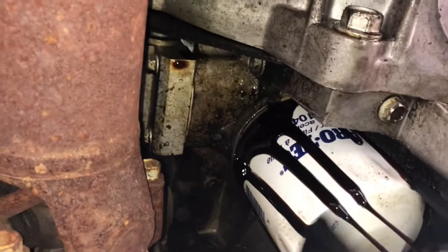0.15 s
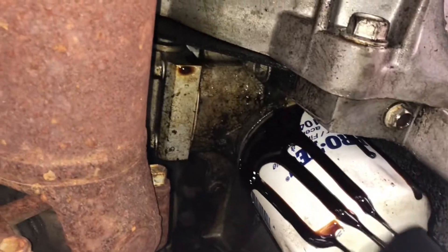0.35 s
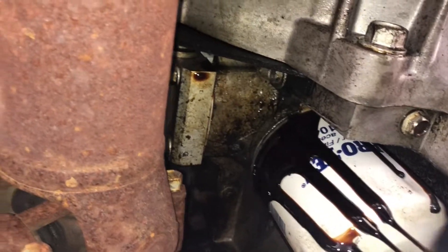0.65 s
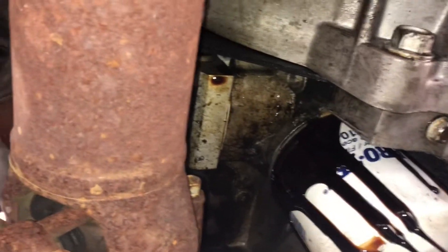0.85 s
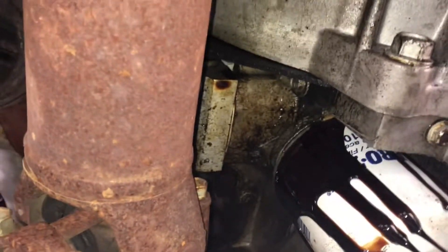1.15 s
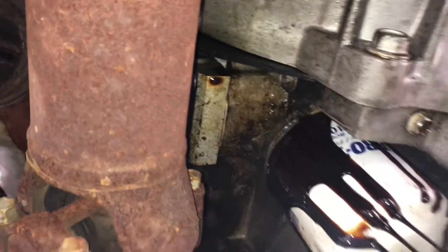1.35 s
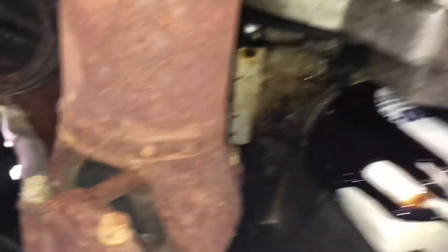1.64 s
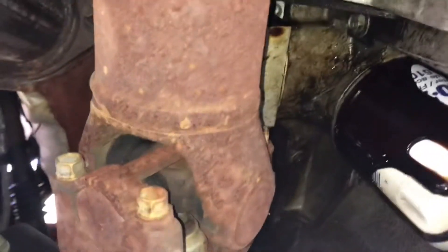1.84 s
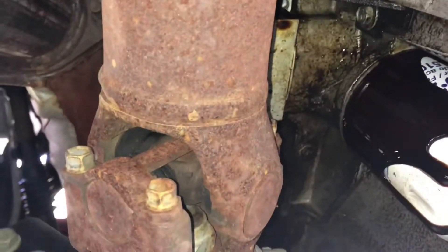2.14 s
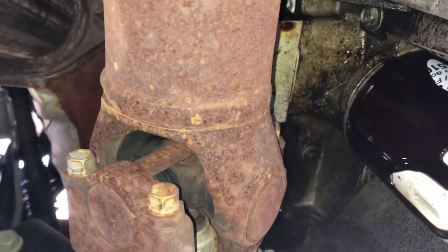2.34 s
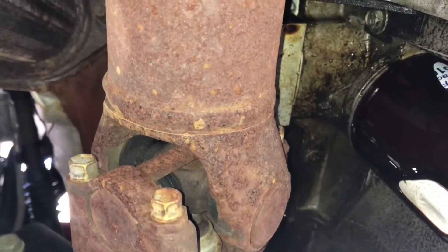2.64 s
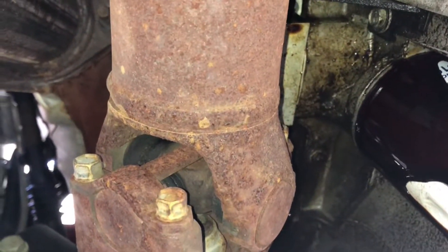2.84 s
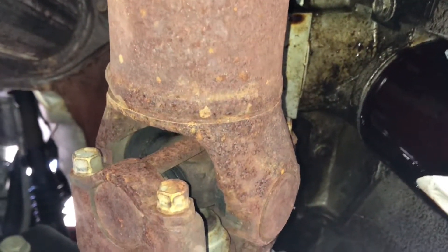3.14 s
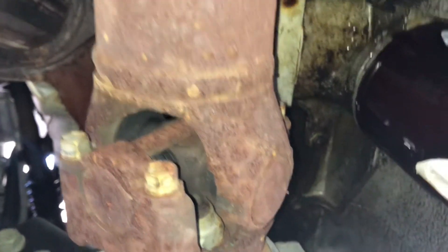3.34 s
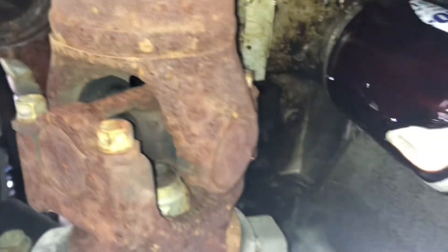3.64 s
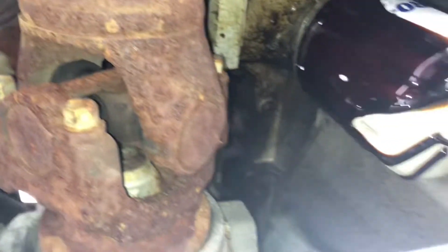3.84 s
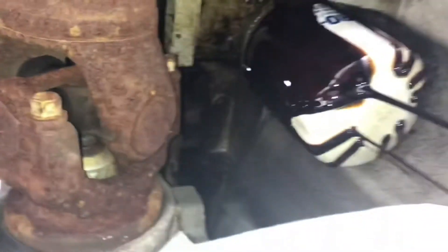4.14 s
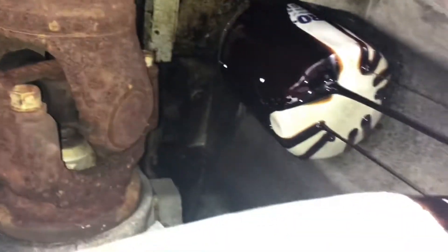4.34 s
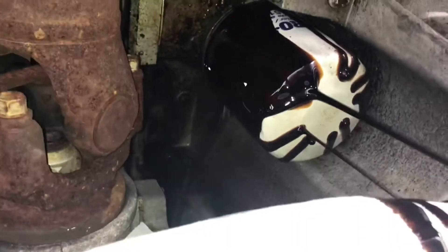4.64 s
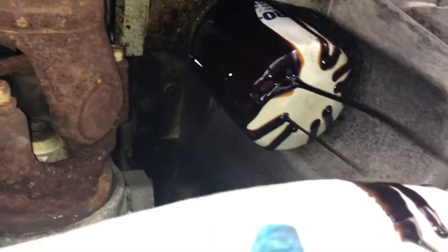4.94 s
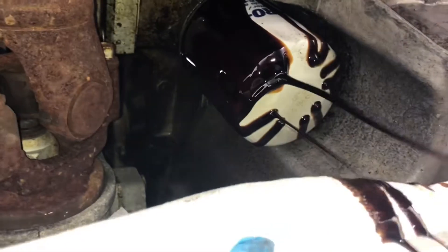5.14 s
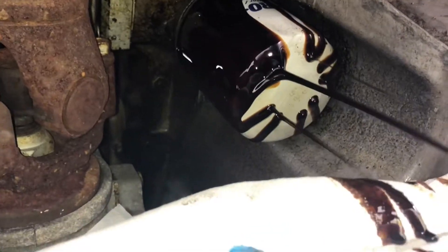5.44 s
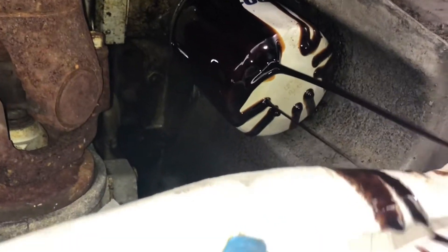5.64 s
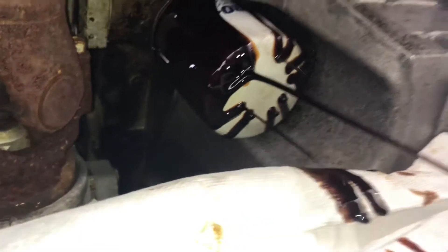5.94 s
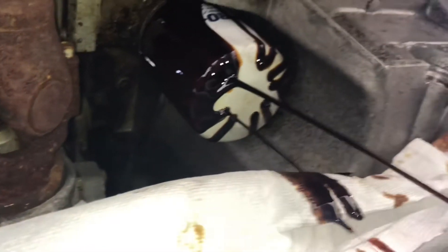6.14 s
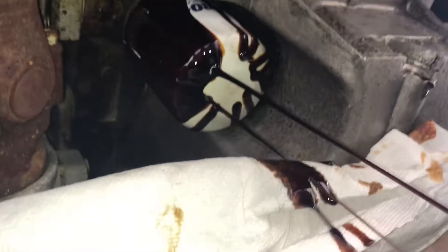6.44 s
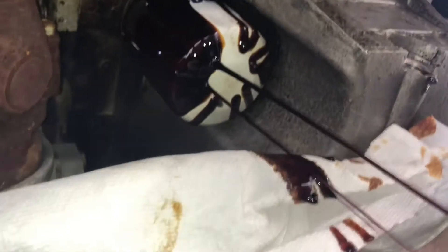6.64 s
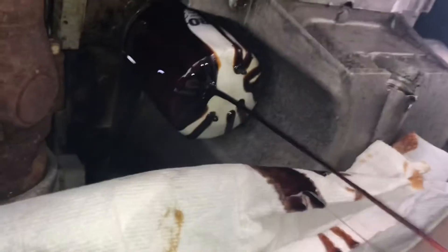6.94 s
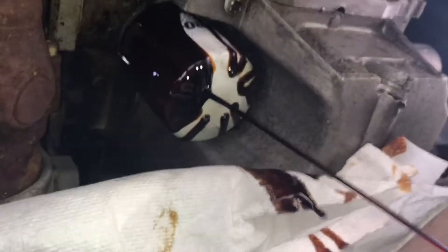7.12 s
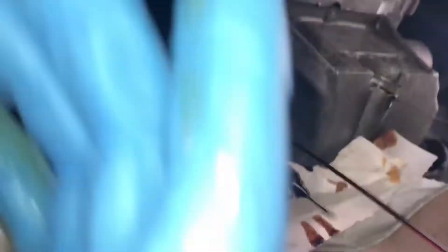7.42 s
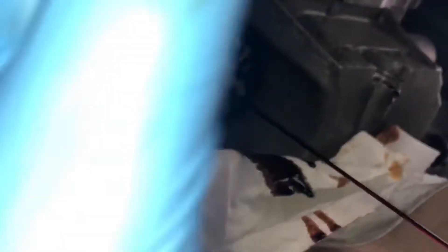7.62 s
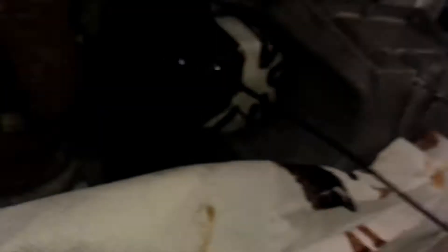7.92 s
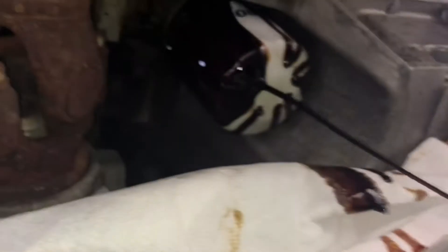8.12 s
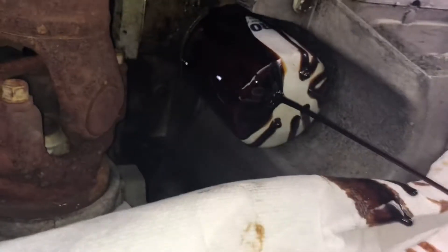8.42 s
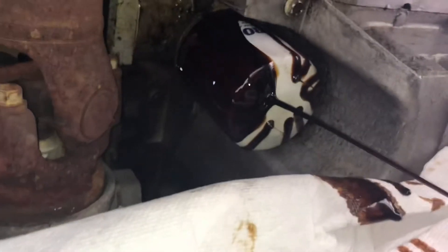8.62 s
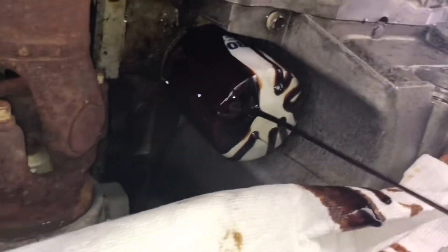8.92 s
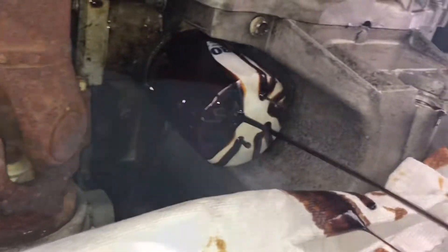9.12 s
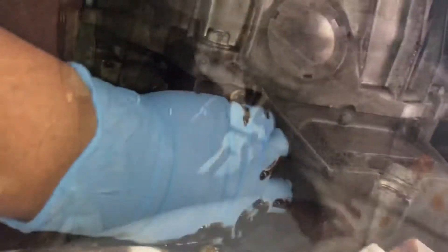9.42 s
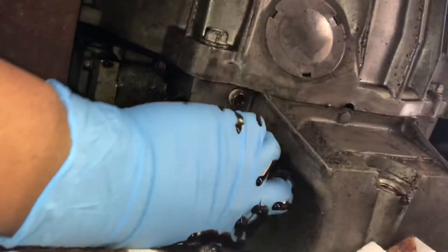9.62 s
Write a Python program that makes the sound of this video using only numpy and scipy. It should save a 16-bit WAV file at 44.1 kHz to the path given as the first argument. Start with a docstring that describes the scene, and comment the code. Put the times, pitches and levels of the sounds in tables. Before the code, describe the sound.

Under a vehicle in a garage, close microphone. A few small sharp wrench clicks and cloth rustle, then the wrench drops and clatters in a plastic drain pan for about a second. Oil gushes out, splatting and drumming on the pan, then trickling, plopping and spitting into its own puddle. A six-cylinder engine hums steadily some way off.

```python
"""Garage, under a vehicle: a cap wrench clicks off a loosened oil filter, drops and clatters into the drain pan.
Contacts are cracks plus ringing modes. Oil patters on the bare pan, then trickles, plops and spits into its
own puddle: bubble grains, single bubbles and noise bursts. One flow sets trickle, spray and small-drop rate.
Glove and paper towel rustle as swelling noise; a like hiss swells at the end.
A six-cylinder engine idles some way off: a sum of orders."""
import sys
import numpy as np
from scipy import signal
from scipy.fft import rfft, irfft, next_fast_len
from scipy.io import wavfile
from scipy.ndimage import uniform_filter1d, map_coordinates

SR = 44100
rng = np.random.default_rng(int(sys.argv[2]) if len(sys.argv) > 2 else 0)


def store_wav(level_fs):
    """Save 16-bit WAV to argv[1]."""
    pcm = np.round(np.clip(np.atleast_2d(level_fs), -1, 1) * 32767)
    wavfile.write(sys.argv[1], SR, pcm.T.astype(np.int16))


N = 430857
TIME = np.arange(N) / SR
AGE = np.arange(SR // 3) / SR  # time axis of one event


def amp(db):
    """Decibels to gain."""
    return 10 ** (np.asarray(db) / 20)


def unit(x):
    """Scale to rms 1."""
    return x / np.sqrt(np.mean(x ** 2) + 1e-20)


def along(points, hz):
    """Interpolate (f/Hz, value) points on a log axis."""
    f, v = np.transpose(points)
    return np.interp(np.log(hz + 1), np.log(f + 1), v)


def gains(rows):
    """One gain curve per dB column, -120 dB outside the rows."""
    s, *columns = np.transpose(rows)
    return [amp(np.interp(TIME, s, column, left=-120, right=-120)) for column in columns]


def filtered(x, response):
    """Multiply the spectrum of x by a response of frequency."""
    size = next_fast_len(len(x) + 8192)
    spectrum = rfft(x, size) * response(np.fft.rfftfreq(size, 1 / SR))
    return irfft(spectrum, size)[:len(x)]


def noise(spectrum, size=N):
    """Coloured noise of rms 1."""
    white = rng.standard_normal(size)
    return unit(filtered(white, lambda hz: amp(along(spectrum, hz))))


def wobble(rate_hz):
    """Smooth random curve, rate_hz knots a second."""
    knots = rng.standard_normal(int(N * rate_hz / SR) + 4)
    return map_coordinates(knots, [TIME * rate_hz])


def fade(t, t60_s):
    """Exponential decay, 60 dB in t60_s."""
    return 1000 ** (-t / np.maximum(t60_s, 1e-4))


def swells(rows):
    """Gain of (t/s, level/dB, rise/s, fall/s) swells; rise and fall each span 20 dB."""
    gain = 0
    for s, db, rise_s, fall_s in rows:
        gain = gain + amp(db - 20 * np.maximum((s - TIME) / rise_s, (TIME - s) / fall_s))
    return gain


def add(track, s, sound):
    """Mix a sound in at s seconds."""
    part = track[max(round(s * SR), 0):][:len(sound)]
    part += sound[:len(part)]


def bubble(t, hz, cycles, rise):
    """Damped sine whose pitch climbs as the bubble nears the surface."""
    life_s = cycles / hz
    climb = t + rise * (t - life_s / 2 * (1 - np.exp(-2 * t / life_s)))
    return np.sin(2 * np.pi * hz * climb) * fade(t, life_s) * (1 - np.exp(-2 * hz * t))


def grains(count, hz, spread, cycles, rise, size_db):
    """Shower of tiny bubbles of random time, pitch and size, levelled to rms 1 over half seconds."""
    when, pitch, size = rng.random((count, 3)).T
    scatter = np.log(pitch / (1 - pitch)) / 2
    pitch_hz = np.clip(hz * np.exp(spread * scatter), 300, 14000)
    t = AGE[:SR // 50]
    strength = amp(-size_db * np.log(np.maximum(size, .02)))
    waves = strength[:, None] * bubble(t, pitch_hz[:, None], cycles, rise)
    where = (when * N).astype(int)[:, None] + np.arange(len(t))
    shower = np.bincount(where.ravel(), waves.ravel(), N)[:N]
    return shower / np.sqrt(np.abs(uniform_filter1d(shower ** 2, SR // 2)) + 1e-9)


# decay of the echo off floor and underbody: f/Hz, t60/s
ECHO_DECAY = [(150, 0.2), (1200, 0.11), (5000, 0.052), (15000, 0.08)]


def echoed(x, wet_db):
    """Floor and underbody answer with a short dense tail, a new one for each third of a second."""
    out = x.copy()
    block = SR // 3
    for start in range(0, N, block):
        hz, t, z = signal.stft(rng.standard_normal(block), SR, nperseg=128)
        decay = fade(t, along(ECHO_DECAY, hz)[:, None])
        tail = signal.istft(z * decay, SR, nperseg=128)[1]
        tail = tail / np.linalg.norm(tail)
        add(out, start / SR + .002, amp(wet_db) * signal.fftconvolve(x[start:start + block], tail))
    return out


# engine orders: multiple of the four-stroke cycle rate, level/dB rms
ENGINE_ORDERS = [(6, -68.5), (10, -62.5), (12, -41.5), (13, -67.5), (14, -48), (15, -51.5), (16, -54.5),
                 (17, -48.5), (18, -46.5), (19, -72), (20, -53.5), (21, -46), (22, -72), (23, -46.5),
                 (24, -63), (25, -49), (26, -52.5), (27, -75.5), (30, -68.5), (33, -68), (34, -63),
                 (38, -57.5), (44, -60.5)]
# gain of engine and garage noise: t/s, level/dB
IDLE_GAIN = [(0, 1), (4.7, 0), (9.05, 0), (9.35, -3.5), (9.6, 0), (9.77, -0.5)]
# garage noise spectrum: f/Hz, level/dB per Hz
GARAGE_SPECTRUM = [(25, -25.5), (40, -5), (62, 1.5), (88, -1), (125, 2.5), (172, -2), (205, 0.5),
                   (330, -12), (520, -17.5), (1000, -22), (2000, -27), (4200, -32), (8000, -43),
                   (16000, -75)]
CYCLE_HZ, HEAVY_FIRING_S = 6.668, .104


def engine():
    """Six firings a cycle make the hum; one heavier firing gives the lope, smeared by the walls."""
    hum = np.zeros(N)
    for multiple, db in ENGINE_ORDERS:
        order = round(multiple)
        smear = rng.normal(0, 0.95) * (order % 6 > 0)  # firing orders stay in phase
        phase = 2 * np.pi * order * CYCLE_HZ * (TIME - HEAVY_FIRING_S) + smear
        hum += amp(db + 0.84 * wobble(3)) * np.sqrt(2) * np.cos(phase)
    # a wavering drone beats with the hum
    drone = amp(-46.5 + 2.2 * wobble(5.7)) * np.sin(2 * np.pi * 85.0 * TIME + 0.83 * wobble(2.008))
    return gains(IDLE_GAIN)[0] * (hum + drone + amp(-42.5) * noise(GARAGE_SPECTRUM))


# glove, sleeve and towel sliding; the last row is a hiss that swells at the end:
# t/s of the maximum, level/dB, rise/s, fall/s
RUSTLE_SWELLS = [(.29, -47, 0.068, 0.25), (.55, -45, 0.24, .15), (1.43, -47.5, 0.21, 1.3),
                 (2.85, -58.5, .5, 2.8), (5.28, -46, .3, 0.1), (5.65, -50, 0.18, 0.16),
                 (8.2, -44.5, 0.096, 0.079), (9.77, -48.5, 0.36, .2)]
# cloth noise spectrum: f/Hz, level/dB per Hz
CLOTH_SPECTRUM = [(200, -17.5), (700, 4.5), (1400, 13.5), (2000, 7.5), (3000, 7), (6000, 5), (12000, 0.5),
                  (16000, -9.5)]
HOLD_DB = -67.5  # the hand never lies quite still


def rustle():
    """Soft noise that swells with each stroke and once more at the end, fluttering a little."""
    flutter = amp(1.3 * wobble(40))
    return np.hypot(swells(RUSTLE_SWELLS), amp(HOLD_DB)) * flutter * noise(CLOTH_SPECTRUM)


# strength of the thread of oil, relative: t/s, level/dB
OIL_FLOW = [(2.149, -57), (2.55, -61), (2.701, -51), (3.75, -52.5), (4.25, -54), (4.7, -55.5), (5.2, -48),
            (5.55, -57.5), (6.0, -59), (6.45, -59), (6.8, -49.5), (7.12, -50), (7.22, -59.5), (8.1, -75),
            (8.3, -53.5), (8.5, -63), (9.05, -60), (9.35, -62.5)]
# gushes that drum on the pan and ebb: t/s of the maximum, relative level/dB, rise/s, ebb/s
OIL_GUSHES = [(2.72, -35, 0.29, 1.4), (3.24, -62, 0.13, 0.15), (3.83, -44, .04, 0.067),
              (8.135, -38, 0.01, 0.38)]
# the thread folds and stirs a run of bubbles into the puddle: t/s, length/s, level/dB, f/Hz
GURGLE_RUNS = [(3.411, 0.077, -40, 1180), (3.648, 0.15, -41, 1166), (3.959, 0.042, -39.5, 1413),
               (4.085, 0.063, -41, 2230), (4.402, 0.037, -43, 860), (5.17, 0.034, -61, 1260),
               (5.901, 0.017, -38, 816), (6.107, 0.042, -36, 1125), (6.471, 0.035, -35, 1180),
               (6.75, 0.085, -37.5, 1400), (6.843, 0.072, -39, 1270), (6.96, 0.13, -37.5, 1202),
               (8.126, 0.071, -38, 1184), (8.679, 0.032, -37, 1395), (8.776, .06, -44.5, 1150),
               (8.899, 0.17, -41.5, 1034)]
SPRAY_DB, SPRAY_SAG_DB_PER_S = -3, 0.5  # re flow; the deepening puddle softens it
GURGLE_EDGE_S, FROTH_DB = 0.013, -18  # finer bubbles froth around each run; level re run


def stream():
    """The thread of oil drums on the pan, stirs small bubbles in the puddle and throws a fine spray."""
    trickle, = gains(OIL_FLOW)
    spray = trickle * amp(SPRAY_DB - SPRAY_SAG_DB_PER_S * (TIME - OIL_FLOW[0][0]))
    froth = 0
    for s, length_s, db, _ in GURGLE_RUNS:
        inside_s = np.minimum(TIME - s, s + length_s - TIME)
        froth = froth + amp(db + FROTH_DB) * np.clip(inside_s / GURGLE_EDGE_S + .5, 0, 1)
    # bubbles need a puddle; on bare plastic the oil only patters
    depth = np.interp(TIME, [3.2, 3.45], [.15, .96])
    drumming = swells(OIL_GUSHES) * grains(count=3000, hz=612, spread=0.23, cycles=3.8, rise=0.028, size_db=4.5)
    patter = grains(count=9000, hz=1700, spread=0.36, cycles=5.1, rise=0.025, size_db=1.0)
    gurgle = grains(count=1700, hz=1200, spread=.15, cycles=30, rise=.15, size_db=2.6)
    beads = grains(count=2000, hz=2350, spread=.33, cycles=36, rise=.3, size_db=3.4)
    bubbling = amp(-8.0) * gurgle + amp(-6.0) * beads
    puddle = trickle * (depth * bubbling + (1 - depth) * patter) + froth * beads
    fizz = spray * grains(count=4500, hz=6730, spread=0.5, cycles=26, rise=.2, size_db=3.0)
    spurts = unit(amp(2.1 * wobble(45)))  # the thread breaks into clumps
    oil = amp(-10.5) * drumming + amp(-2.0) * puddle + amp(-2.5) * fizz
    return echoed(spurts * oil, wet_db=-4.0)


DROP_RATE_POWER = .65  # power of the flow that sets the drop rate


def small_drops(count, db, scatter_db, hz, spread):
    """Rows (t/s, level/dB, f/Hz) of drops at uneven intervals, more often as the flow grows."""
    fallen = np.cumsum(gains(OIL_FLOW)[0] ** DROP_RATE_POWER)
    share = (np.arange(count) + rng.random(count)) / count
    s = np.interp(share, fallen / fallen[-1], TIME)
    size, pitch = np.clip(rng.standard_normal((count, 2)), -2, 2).T
    return list(zip(s, db + scatter_db * size, hz * np.exp(spread * pitch)))


GURGLE_GAP_S, GURGLE_SCATTER_DB, GURGLE_DETUNE = 0.022, 1.5, 0.036  # bubble to bubble; detune in log pitch


def gurgle_bubbles():
    """Rows (t/s, level/dB, f/Hz) of the like-sized bubbles in each run."""
    rows = []
    for s, length_s, db, hz in GURGLE_RUNS:
        late, size, pitch = np.clip(rng.standard_normal((12, 3)), -2, 2).T
        after_s = GURGLE_GAP_S * np.abs(np.arange(len(late)) + .2 * late)
        levels_db = db + GURGLE_SCATTER_DB * size
        run = np.column_stack([s + after_s, levels_db, hz * np.exp(GURGLE_DETUNE * pitch)])
        rows += list(run[after_s < length_s])
    return rows


# big drops that trap a bubble: t/s, level/dB, nominal f/Hz
BIG_PLOPS = [(3.285, -29, 3040), (3.639, -31, 1296), (3.956, -34.5, 1014), (4.141, -32, 3560),
             (4.381, -25.5, 3200), (4.461, -35, 1940), (4.463, -35.5, 955), (4.653, -35, 4630),
             (4.908, -34, 3900), (5.063, -32, 2970), (5.17, -30, 1244), (5.413, -36, 2140),
             (5.435, -36, 2100), (5.463, -35, 3030), (5.788, -32.5, 1800), (5.818, -29.5, 2850),
             (5.908, -31.5, 3200), (6.11, -29, 1920), (6.468, -33, 1540), (6.561, -35.5, 1812),
             (7.008, -33.5, 1148), (7.125, -21.5, 2370), (7.484, -36.5, 1850), (7.71, -34.5, 3520),
             (7.845, -31.5, 2360), (8.033, -32.5, 3910), (8.12, -27, 852), (8.123, -40, 1850),
             (8.462, -34, 1946), (8.611, -32.5, 1070), (8.66, -31, 1770), (9.048, -31.5, 2137),
             (9.121, -35.5, 2990), (9.133, -33.5, 980), (9.2, -38.5, 1340)]
# sharp spits of oil: t/s, relative level/dB, f/Hz
OIL_SPITS = [(2.62, -28, 5600), (2.8281, -35, 4270), (3.0092, -28.5, 10270), (3.607, -33.5, 8200),
             (3.721, -30, 5200), (3.9882, -32, 7950), (4.121, -25.5, 7500), (4.27, -32.5, 11240),
             (4.337, -32, 5940), (5.046, -28, 4150), (5.4858, -37, 4750), (5.5487, -27, 3800),
             (5.672, -32, 5615), (5.9635, -36, 5570), (6.14, -37, 10920), (6.291, -35.5, 5820),
             (6.3934, -31, 5400), (6.6104, -27.5, 6960), (6.653, -28, 11340), (7.1468, -32.5, 5450),
             (7.483, -19, 7640), (8.0329, -31, 7020), (8.307, -36, 9000), (8.46, -23, 7280),
             (8.697, -30.5, 6880), (9.0628, -28, 7500)]
# heavy splats of oil, first on bare plastic, the last two into the puddle: t/s, relative level/dB
OIL_SPLATS = [(2.634, -18.5), (2.684, -24.5), (2.744, -17.5), (2.833, -18.5), (2.868, -19), (3.006, -29),
              (8.119, -46.5), (8.186, -27.5)]
# splat and smack noise spectrum: f/Hz, level/dB per Hz
SPLAT_SPECTRUM = [(250, -15), (450, -5), (620, -20), (900, -1), (1500, 9.5), (2600, 2.5), (5000, -1.5),
                  (14000, -9)]


def drops():
    """Single drops: plops are bubbles, spits are noise bursts with a chirp, splats are fading noise."""
    out, t = np.zeros(N), AGE[:SR // 10]
    small_plops = small_drops(count=190, db=-43.5, scatter_db=2, hz=2095, spread=0.5)
    for s, db, hz in BIG_PLOPS + gurgle_bubbles() + small_plops:
        smack = noise(SPLAT_SPECTRUM, size=len(t)) * fade(t, 0.025)
        cycles = 42 * (hz / 1500) ** 0.25  # small bubbles ring for more cycles
        plop = bubble(t, hz * 0.958, cycles, rise=rng.uniform(0.02, 0.46))
        add(out, s, amp(db) * (plop + 0.22 * smack))
    small_spits = small_drops(count=48, db=-39, scatter_db=2, hz=7597, spread=0.1)
    for s, db, hz in OIL_SPITS + small_spits:
        snap = fade(t, 0.026) * (1 - fade(t, 0.0027))
        peak = [(hz / 4, -17), (hz / 2, -14), (hz, 0), (hz * 1.16, -4), (hz * 1.79, -16), (hz * 6, -22)]
        burst = snap * noise(peak, size=len(t))
        # a bubble bursts: its opening widens and the pitch shoots up
        chirp = bubble(t, hz * .72, cycles=73, rise=0.474)
        add(out, s, amp(db - 4.5) * (burst + 0.32 * chirp))
    for s, db in OIL_SPLATS:
        add(out, s, amp(db - 13.0) * noise(SPLAT_SPECTRUM, size=len(t)) * fade(t, 0.051))
    return echoed(out, wet_db=-5)


# single touches of the wrench, and a soft low bump of the gloved hand at .376 s:
# t/s, treble/dB, body/dB, thud/dB, decay scale/s
TOUCHES = [(.092, -49, -46.5, -46, 0.097), (0.1292, -22, -33, -63, 0.027), (0.164, -38.5, -40, -47, .09),
           (0.2436, -25.5, -31.5, -50, 0.065), (0.376, -42, -42, -35.5, 0.14), (1.4025, -38, -47, -65, 0.1),
           (1.5483, -40.5, -41, -57, 0.084), (1.743, -65, -46, -37, .07),
           (1.774, -28.5, -24.5, -17.5, .067), (2.068, -36, -32.5, -28.5, 0.082),
           (2.1148, -36.5, -49.5, -37.5, 0.049), (2.1758, -56, -41.5, -49.5, 0.17)]
# tumbling wrench, one end landing before the other: t/s, body/dB, thud/dB, treble/dB, decay scale/s,
# lag of the other end/s, its body/dB, its treble/dB, first rattle body/dB
WRENCH_LANDINGS = [(1.0346, -19, -20.5, -27, 0.049, 0.0049, -24, -21.5, -38),
                   (1.4444, -12.5, -22, -16, .12, 0.017, -19.5, -42, -37.5),
                   (1.5774, -22.5, -21.5, -35.5, 0.071, 0.02, -28.5, -23.5, -39),
                   (1.7646, -27, -18, -42, 0.057, .0233, -35, -18, -29),
                   (1.887, -33, -26.5, -41, 0.14, .01, -31.5, -30.5, -42.5),
                   (2.0192, -37, -17.5, -33, .11, 0.018, -34.5, -44, -37.5)]
TOUCH_SHARP_HZ, LAND_SHARP_HZ = 10300, 6400  # hardness of the contact
SLAP_SHARP_HZ, SLAP_THUD_DB, SLAP_DECAY_S = 15000, -3.5, 0.076  # the other end slaps harder; thud re its body
RATTLE_S, RATTLE_SHRINK, RATTLE_LOSS_DB = .046, 0.43, 5  # first flight, each over the one before, loss a rebound
RATTLE_THUD_DB, RATTLE_TREBLE_DB = 4, -6.5  # re rattle body
RATTLE_DECAY_S, RATTLE_SHARP_HZ = 0.096, 9500


def contacts():
    """Every wrench contact and the hand bump: (t/s, body, thud, treble/dB, decay scale/s, sharpness/Hz)."""
    rows = []
    for s, treble, body, thud, decay_s in TOUCHES:
        rows.append((s, body, thud, treble, decay_s, TOUCH_SHARP_HZ))
    for s, body, thud, treble, decay_s, lag_s, slap, slap_treble, rattle in WRENCH_LANDINGS:
        rows.append((s, body, thud, treble, decay_s, LAND_SHARP_HZ))
        rows.append((s + lag_s, slap, slap + SLAP_THUD_DB, slap_treble, SLAP_DECAY_S, SLAP_SHARP_HZ))
        for k in range(3):
            s = s + RATTLE_S * RATTLE_SHRINK ** k
            db = rattle - RATTLE_LOSS_DB * k
            rows.append((s, db, db + RATTLE_THUD_DB, db + RATTLE_TREBLE_DB, RATTLE_DECAY_S, RATTLE_SHARP_HZ))
    return rows


# modes of wrench and pan: f/Hz, relative level/dB, t60/s at a decay scale of 0.12 s
RING_MODES = [(247, -12, 0.13), (370, -3, 0.079), (512, 2.5, 0.071), (661, 2, 0.085), (802, 4.5, 0.058),
              (922, -0.5, 0.13), (1090, -6.5, 0.032), (1232, -20, 0.26), (1452, -1, 0.11),
              (1503, -6.5, 0.21), (1834, 5, 0.047), (2070, -12, 0.1), (2960, 2, 0.07), (3330, 0.5, 0.066),
              (3700, -4, 0.066), (4250, -2.5, .08), (4670, -21, 0.074), (5030, -5, 0.051), (5836, 4, 0.04),
              (7600, -7, 0.044), (9600, -19.5, 0.054), (12600, 4.5, 0.045)]
# dull crack of a contact: f/Hz, level/dB per Hz
CRACK_SPECTRUM = [(40, -13), (130, 4.5), (700, 0), (1500, 3.5), (2400, -3), (5500, -8), (8000, -9),
                  (13000, -7), (16000, -12.5)]


def wrench():
    """Each contact cracks and rings; blows on the pan thud, steel on steel is bright."""
    edges = [([1100, 4000], "bandpass"), (1100, "lowpass"), (4000, "highpass")]  # body, thud, treble
    bands = [signal.butter(3, edge, kind, fs=SR, output="sos") for edge, kind in edges]
    hz, mode_db, mode_t60_s = np.transpose(RING_MODES)[:, :, None]
    out = np.zeros(N)
    for s, *band_db, decay_s, sharp_hz in contacts():
        strength = amp(mode_db + rng.normal(0, 2.2, hz.shape))
        phase = rng.uniform(0, 2 * np.pi, hz.shape)
        # the way the tool lies shifts its high modes most
        pitch_hz = hz * (1 + rng.normal(0, 0.0041, hz.shape) * hz / hz.max())
        # a held or wedged tool rings for less long
        decays = fade(AGE, mode_t60_s * decay_s / .12)
        ring = np.sum(strength * np.sin(2 * np.pi * pitch_hz * AGE + phase) * decays, axis=0)
        crack = noise(CRACK_SPECTRUM, size=len(AGE)) * (fade(AGE, 1.15 * decay_s) + 3 * fade(AGE, 0.007))
        blow = (unit(ring) + amp(5.5) * unit(crack)) * (1 - fade(AGE, 0.003))
        # a softer contact excites less treble
        blow = signal.lfilter(*signal.butter(2, min(sharp_hz / (SR / 2), .95)), blow)
        for sos, db in zip(bands, band_db):
            part = signal.sosfilt(sos, blow)
            add(out, s, amp(db) * part / np.std(part[:SR // 100]))  # level set over the first 10 ms
    return echoed(out, wet_db=-10)


def scene():
    """Sum of all sources, one channel."""
    return (engine() + rustle() + stream() + drops() + wrench())[None]


TOP_HZ = 15900


def record(dry):
    """Round off the highest peaks, then cut everything above the band limit."""
    rounded = dry[0] / (1 + np.abs(dry[0] / .95) ** 6) ** (1 / 6)
    return filtered(rounded, lambda hz: np.clip((TOP_HZ - hz) / 600 + .5, 0, 1))[None]


dry = scene()
out = record(dry)
store_wav(out)
```